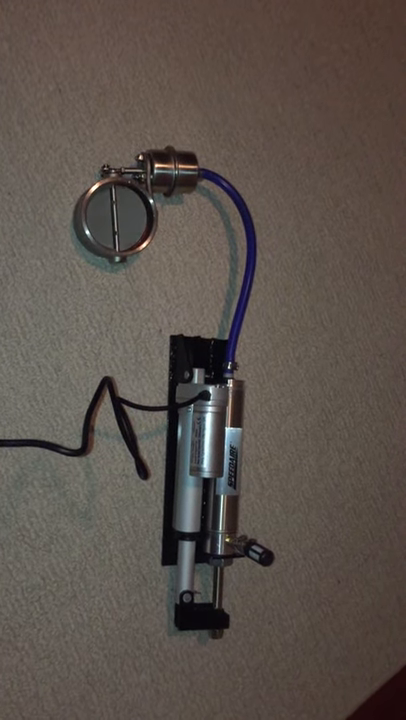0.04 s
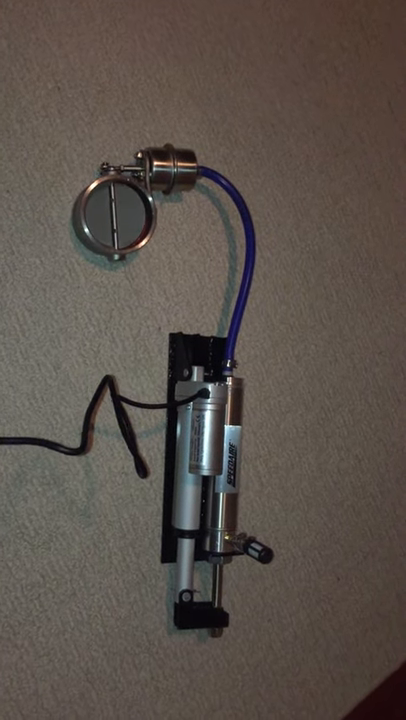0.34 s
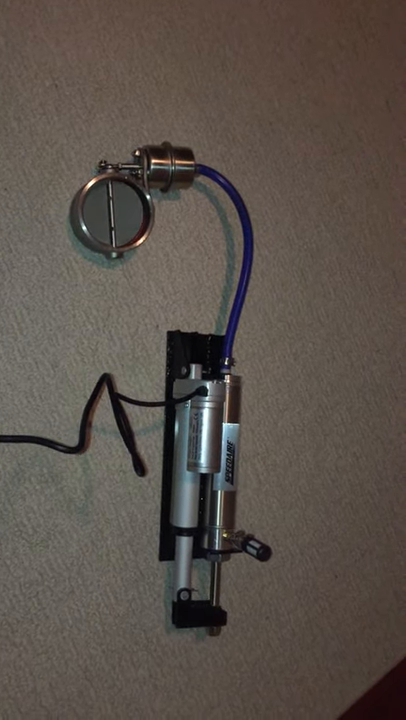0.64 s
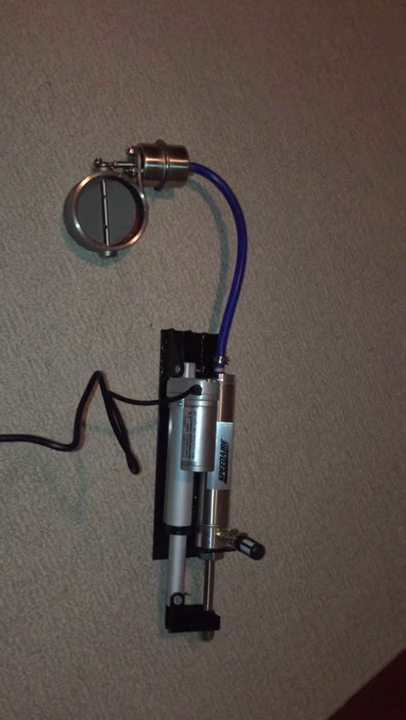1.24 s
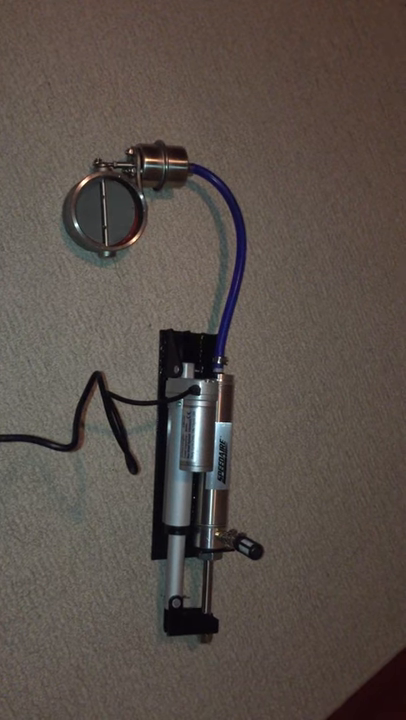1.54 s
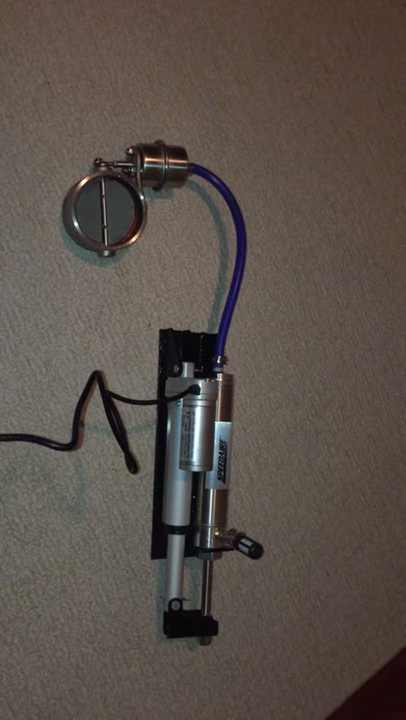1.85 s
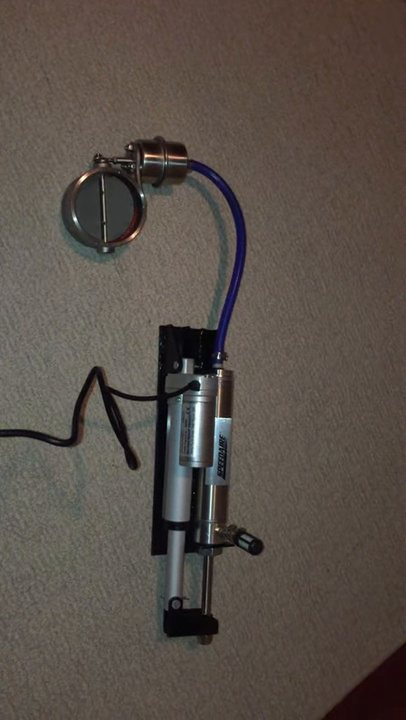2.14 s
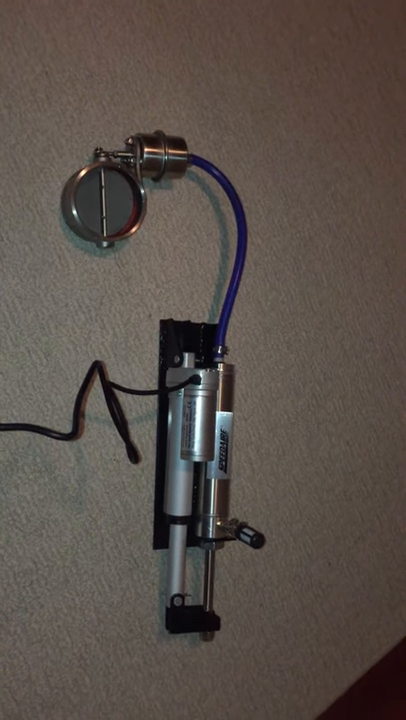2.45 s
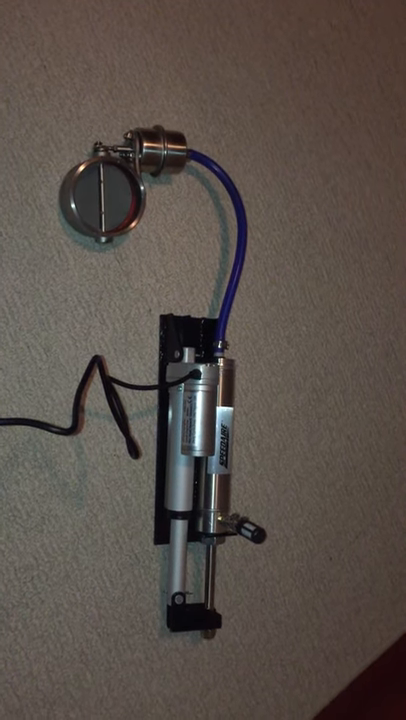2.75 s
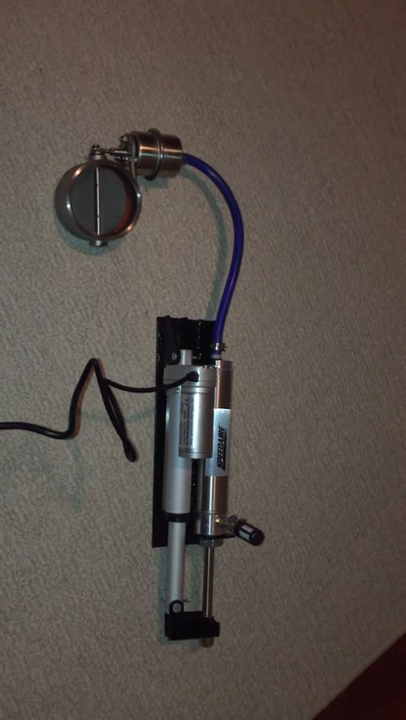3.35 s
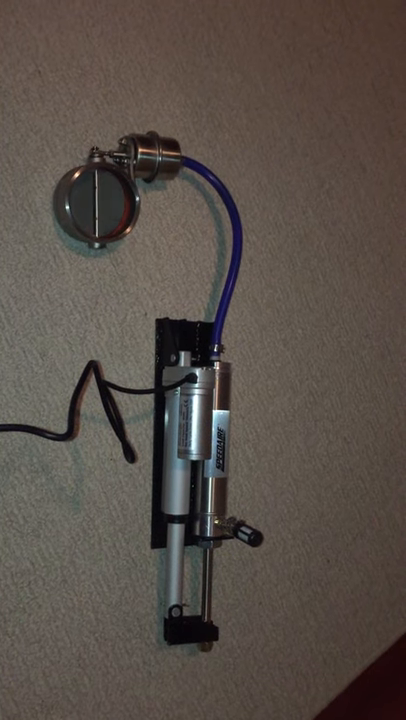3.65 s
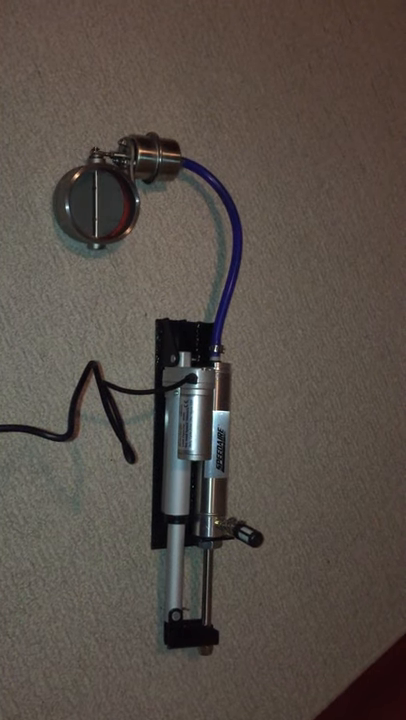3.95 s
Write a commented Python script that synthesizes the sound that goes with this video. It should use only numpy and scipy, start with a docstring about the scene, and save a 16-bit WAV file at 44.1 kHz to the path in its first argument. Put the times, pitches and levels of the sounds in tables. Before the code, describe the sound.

In a small room with little echo, an electric actuator motor blips once and rattles to a stop, then whirs continuously. The gears whine and grind in a fast, repeating pattern, with light ticks and scrapes on top.

```python
"""A small carpeted room with low rumble and mains hum. An electric linear actuator on the floor is jogged
once, coasts to a stop with a chatter of loose gears, then runs on and pushes an air cylinder.
Its gears whine and rasp in a pattern that repeats with each turn of a wheel, while a slower stage
clacks tooth by tooth. Rasp and clacks ring the metal housing; ticks, rubs and scratches sit on top."""
import sys
import numpy as np
from scipy import signal
from scipy.fft import rfft, irfft
from scipy.io import wavfile
from scipy.ndimage import uniform_filter1d, map_coordinates

SR = 44100
rng = np.random.default_rng(int(sys.argv[2]) if len(sys.argv) > 2 else 0)


def materialize(psi):
    """Save the field psi as 16-bit PCM at rate SR to the path in sys.argv[1].

    A 1-D psi becomes a single channel; in a 2-D psi each row is a channel.
    """
    bounded = np.clip(np.atleast_2d(psi).T, -1, 1)
    quanta = np.round(bounded * 32767).astype(np.int16)
    wavfile.write(sys.argv[1], SR, quanta)


N = 176400

# Motor cues. Each row: power on in seconds, power off in seconds, strength in dB.
MOTOR_RUNS = [(.351, .468, -2), (.757, 4.2, -0.5)]
# Gear mesh rate at full speed. Each row: time in seconds, rate in Hz.
MESH_PITCH = [(0.85, 1337), (2.48, 1328), (2.86, 1331), (3.9, 1327)]
# The load on the gears. Each row: time in seconds, gear noise level in dB, treble level in dB.
GEAR_LOAD = [(.4, -49, -51), (.85, -49.5, -53.5), (1.2, -49, -55.5), (1.55, -49, -54), (1.85, -49, -53.5),
             (2.45, -49.5, -53), (2.9, -49.5, -53), (3.4, -49, -52.5), (3.5, -50.5, -52.5),
             (3.73, -51, -53.5), (3.8, -50.5, -53), (4, -50.5, -51.5)]
# The housing's broad resonances, then its finer peaks and dips. Each row: frequency in Hz, gain in dB.
HOUSING_EQ = [(290, -54), (500, -22.5), (726, -19), (803, -15), (1120, -7.5), (1290, -4.5), (1410, -5.5),
              (1580, 2), (1670, -7), (1880, -2.5), (2010, -13.5), (2390, -5.5), (2970, -27.5),
              (3190, -16.5), (3850, -7.5), (4440, -18), (4980, -9.5), (5510, -23), (5830, -23), (6090, -35),
              (7130, -23.5), (8120, -34), (10100, -33), (13600, -32.5), (15500, -36)]
HOUSING_FINE_EQ = [(600, -2), (1000, 1), (1350, 0), (1490, -1), (1560, -2), (1630, 1), (1780, 2),
                   (1855, -2), (1920, 0.5), (2050, -1.5), (2180, 4), (2350, -0.5), (2450, -3.5),
                   (2700, 2.5), (3000, 2), (3250, 1.5), (3450, -2.5), (3700, 3.5), (4100, -0.5), (4330, 2),
                   (4560, 0), (4850, -1), (4980, -10), (5150, 1.5), (5450, -5.5), (5700, 8), (6100, -11),
                   (6450, 14), (6700, -0.5), (7300, 6), (7800, -2.5), (9000, 6.5), (10000, -5.5),
                   (12000, 2)]
# Whine partials. Each entry: cycles per wheel turn; in the second list, dB against the gear noise.
PARTIAL_ORDERS = [64, 65, 67, 70, 76, 80, 92, 96, 114, 132, 158, 178, 180, 240, 300]
PARTIAL_DB = [-24.5, -29, -23, -23, -23.5, -17.5, -19, -19, -22, -23, -21.5, -18.5, -16, -24, -33]
# A low pair of gear tones. Each entry: cycles per wheel turn; in the second list, balance in dB.
GROAN_PAIR = [60, 62]
GROAN_BALANCE = [-4.5, -.5]
# Fader rides for mesh tone, high singing tone, groan and rub. Each row: time in seconds, level in dB.
MESH_RIDE = [(.4, -65), (.95, -57.5), (1.16, -54.5), (1.22, -59), (1.4, -58), (1.62, -56), (1.88, -63),
             (1.95, -52), (1.99, -64), (2.04, -55), (2.09, -62), (2.25, -56.5), (2.5, -53.5), (2.57, -53.5),
             (2.66, -54.5), (2.9, -60.5), (3.42, -57.5), (3.65, -62), (3.86, -67), (3.93, -64), (4, -74)]
SING_RIDE = [(.45, -57), (.88, -71), (.94, -72), (1.1, -58), (1.35, -56), (1.49, -65), (1.56, -58),
             (1.7, -69), (1.78, -65), (2.1, -58.5), (2.4, -59), (2.72, -58), (2.8, -53), (2.95, -58),
             (3.11, -60), (3.26, -58.5), (3.41, -53.5), (3.49, -69), (3.56, -66), (3.68, -56), (3.9, -58),
             (4, -64)]
GROAN_RIDE = [(.9, -75), (1.7, -74), (2.0, -65.5), (2.9, -64.5), (3.9, -64.5)]
RUB_RIDE = [(.4, -73), (1.0, -65), (1.6, -62), (2.3, -58), (3.2, -59), (3.9, -58.5)]
# Wheel faults. Each row: time of one tick in seconds, strength in dB, its own ring in Hz.
WHEEL_FAULTS = [(2.624, -4, 15480), (2.592, -10, 13950)]
# Metal rung by ticks, rubs and chatter. Each row: pitch in Hz, 60 dB decay in seconds, level in dB.
TICK_RING = [(10800, 0.011, -1), (12140, 0.01, -5), (12650, 0.0073, -2), (13850, 0.0067, 0),
             (15470, 0.0067, -7)]
RUB_RING = [(2387, 0.023, 1.5), (4020, 0.041, -5), (4845, .03, -7), (5130, 0.025, -5.5), (5700, 0.015, -18)]
CHATTER_RING = [(990, 0.012, -10), (1336, 0.026, -5), (1840, 0.027, 1.5), (3880, 0.0088, -5),
                (4360, 0.0093, -2)]
# Loose gears. Each row: start in seconds, level in dB, decay in seconds, ring in Hz, ring level in dB.
RATTLES = [(0.369, -53, 0.027, 1830, -48.5), (0.445, -55.5, 0.013, 1320, -66),
           (.554, -51.5, 0.01, 1860, -51.5), (0.588, -57, 0.0095, 1870, -56),
           (0.62, -62, .008, 1333, -54.5), (.762, -68, .008, 4920, -60), (0.783, -62, 0.0092, 685, -62.5)]
# Slack taken up or released. Each row: start in seconds, level into the housing in dB.
SLACK_KNOCKS = [(.35, -28), (0.3658, -13), (.377, -12), (.388, -16), (0.761, -26), (.773, -16)]
# The gears catch. Each row: start in seconds, level in dB, decay in seconds.
GEAR_CATCHES = [(0.371, -51.5, .008), (.396, -57, .006), (0.922, -59, 0.0052), (1.519, -47.5, .004),
                (1.63, -53, .005), (1.795, -55, .01), (2.025, -49, .008), (2.08, -51, 0.006),
                (2.195, -59, .005), (2.243, -52, .008), (2.439, -56, .005), (2.473, -52, .006),
                (2.667, -53, .004), (2.697, -48, .007), (3.014, -55, .006), (3.36, -50, 0.0087)]
# Tones of the slowing gears. Each row: peak time in seconds, pitch there in Hz, level in dB.
COAST_GLIDES = [(.463, 1853, -57), (.486, 2266, -58), (.532, 1790, -54), (.556, 968, -58), (.59, 699, -67),
                (.61, 2170, -63), (.677, 1240, -72)]
# Soft thuds under the whirr. Each row: peak time in seconds, level in dB.
LOW_THUDS = [(.99, -65.5), (1.44, -63), (1.8, -65), (2.45, -63.5), (2.72, -63.5), (3.01, -64), (3.74, -64),
             (3.92, -61)]
# Room tone. Each row: frequency in Hz, gain in dB.
ROOM_TONE_EQ = [(15, -35), (25, -15), (37, -7.5), (122, -10), (136, -12), (148, -14.5), (233, -5.5),
                (289, -7.5), (340, -14.5), (389, -10.5), (433, -12.5), (537, -14), (648, -23.5),
                (4500, -31), (15500, -40.5)]
# Tone of the rasp and of the clacks. Each row: frequency in Hz, gain in dB.
RASP_EQ = [(500, -4), (900, 0), (2500, 0), (5000, -.5), (7000, -6), (14000, -.5)]
CLACK_EQ = [(500, -5), (1000, 1), (2500, -3), (5000, -2), (7000, 1.5), (9000, -1), (14000, -12)]

WHEEL_TEETH, CLACKS_PER_MESH = 100, .0734
SING_ORDER, SQUEAL_ORDER = 118.1, 362  # cycles per wheel turn


def actuator(t):
    """The motor drives the gear train; returns a noise stem and a tone stem."""
    speed, force = motor(t)
    mesh_hz = speed * (1 + .001187 * walk(6)) * np.interp(t, *np.array(MESH_PITCH).T)
    mesh = np.cumsum(mesh_hz) / SR
    turns, teeth = mesh / WHEEL_TEETH, mesh * CLACKS_PER_MESH
    teeth -= np.interp(1.0372, t, teeth)  # a tooth lands at this second
    when, gear_db, treble_db = np.array(GEAR_LOAD).T
    gear_db, treble_db = np.interp(t, when, gear_db), np.interp(t, when, treble_db)
    drive = rasp(turns) + clacks(t, teeth, speed)
    body = housing(drive, brightness(t, turns, speed, treble_db - gear_db))
    whirr = undb(gear_db) * (body + thrum(t) + ticks(t, turns, speed)) + speed ** 2 * rub(t, turns)
    tones = force * speed ** 1.08 * whine(t, turns, gear_db)
    tones = band(tones, 723, 10500, order=6)  # the small housing hardly radiates low tones
    return force * whirr + chatter(t) + knocks() + scratches(t), tones + coasting(t)


def motor(t, spin_up_s=.011, coast_s=.225):
    """Speed 0-1 and strength: a quick spin-up; with power off, friction slows the motor evenly."""
    speed, force = 0, 0
    for on, off, db in MOTOR_RUNS:
        run = (1 - np.exp(-np.maximum(t - on, 0) / spin_up_s)) * np.clip(1 - (t - off) / coast_s, 0, 1)
        speed, force = speed + run, force + undb(db) * run ** 1.37
    return speed, force


def rasp(turns):
    """Worn teeth grind: grain that repeats once, twice and five times a turn, over a scraping hiss."""
    grain = unit(undb(3) * worn(turns, 3000) + undb(-2) * worn(2 * turns, 1500)
                 + undb(-5.5) * worn(5 * turns, 600))
    grind = undb(-4.5) * grain + undb(-5.5) * rng.standard_normal(N)
    throb_db = .39 * walk(24.98) + .74 * np.sin(10 * np.pi * turns)
    return colour(grind * undb(throb_db), RASP_EQ)


def clacks(t, teeth, speed, jitter_s=.00007, spread_s=.003, fade_db_per_s=1.2):
    """Each slow tooth strikes, then scrapes; the strikes soften along the stroke."""
    times = wraps(teeth)
    timing, weight = 2 * rng.random((len(times), 2)).T - 1
    hits = clicks(times + jitter_s * timing, 1 + .45 * weight)
    hz = np.arange(N // 2 + 1) * SR / N
    lag_s = spread_s / (1 + hz / 7000)  # in the metal the highs travel ahead of the lows
    strikes = irfft(rfft(hits) * np.exp(-2j * np.pi * np.cumsum(lag_s) * SR / N), N)
    scrape = unit(np.exp(-((teeth - .1) % 1) / .15) * rng.standard_normal(N))
    clacking = unit(unit(strikes) + undb(-4) * scrape) * speed ** 1.1
    return undb(-2.5 - fade_db_per_s * (t - 1)) * colour(clacking, CLACK_EQ)


def housing(drive, treble_gain):
    """Gear forces ring the metal shell; its treble rides on a separate fader."""
    body = colour(colour(drive, HOUSING_EQ), HOUSING_FINE_EQ)
    mid_rms = np.std(band(body, 800, 2350)[SR:])
    treble = signal.sosfiltfilt(signal.butter(2, 3000, 'high', fs=SR, output='sos'), body)
    return undb(-1.5) * (body - treble + treble * treble_gain) / mid_rms


def brightness(t, turns, speed, tilt_db, surge_db=1.5, flicker_db=1.1):
    """Treble gain: it surges with the load about every third turn and dulls as the motor slows."""
    surge = surge_db * np.cos(2 * np.pi * .331 * turns_since(2.45, t, turns)) * (t > MOTOR_RUNS[1][0])
    return undb(tilt_db - np.mean(tilt_db) + flicker_db * walk(17) + surge) * speed ** .52


def whine(t, turns, gear_db):
    """Meshing teeth sing: a bed of partials, two tones swelling in turn and a growing groan."""
    bed = gear_tones(turns, PARTIAL_ORDERS, PARTIAL_DB, waver_db=2, wobble_rad=.2, throb=.3)
    mesh = gear_tones(turns, [WHEEL_TEETH], [0], waver_db=1.02, wobble_rad=.2)
    sing = gear_tones(turns, [SING_ORDER], [0], waver_db=1.5, wobble_rad=.47, throb=.3)
    groan = gear_tones(turns, GROAN_PAIR, GROAN_BALANCE, waver_db=-.4, wobble_rad=.11)
    return (undb(gear_db) * bed + fader(t, MESH_RIDE) * mesh
            + fader(t, SING_RIDE) * sing + fader(t, GROAN_RIDE) * groan)


def gear_tones(turns, orders, levels_db, waver_db, wobble_rad, throb=0):
    """Wavering sines locked to the wheel, with an optional throb five times a turn."""
    tones = sum(undb(db + waver_db * walk(7)) * sine(k * turns + rng.random(), wobble_rad * walk(25.19))
                for k, db in zip(orders, levels_db))
    return (1 + throb * np.sin(10 * np.pi * turns)) * tones


def rub(t, turns, width_turns=.093, swing_hz=45):
    """The wheel rubs twice a turn; it runs out of true, so the squeal glides up and down in turn."""
    away = ((2 * turns_since(3.324, t, turns) + .5) % 1 - .5) / 2
    contact = swell(away, 0, width_turns)
    friction = worn(2 * turns, 1500) + undb(1.5) * rng.standard_normal(N)
    glide = np.cumsum(swing_hz * np.cos(2 * np.pi * turns_since(2.481, t, turns))) / SR
    squeal = sine(SQUEAL_ORDER * turns + glide, .5 * walk(60)) * undb(.3 + 2.3 * walk(20))
    return fader(t, RUB_RIDE) * (ring(contact * friction, RUB_RING) + contact * squeal)


def ticks(t, turns, speed, decay_turns=.045):
    """Each fault gives a thin metallic tick once a turn, over a sizzle of grit between the teeth."""
    blows, pings = 0, 0
    for at, db, hz in WHEEL_FAULTS:
        gate = np.exp(-(turns_since(at, t, turns) % 1) / decay_turns)
        blow = gate * (worn(turns, 3000) + rng.standard_normal(N))
        blows += undb(db) * blow
        pings += ring(blow, [(hz, .012, 0)])
    grit = rng.standard_normal(N) * undb(2.8 * walk(300) + 2.2 * walk(24.7))
    metal = undb(-2.5) * ring(blows, TICK_RING) + undb(-7.5) * pings + undb(-3) * ring(grit, TICK_RING)
    return undb(-24.5 + .36 * (t - 2.5)) * speed ** 3 * metal


def chatter(t):
    """Loose gears rattle as the motor starts and coasts; each rattle leaves one resonance ringing."""
    envelope, rings = 0, 0
    for at, db, decay_s, ring_hz, ring_db in RATTLES:
        envelope += undb(db) * burst(t, at, decay_s)
        rings += undb(ring_db) * burst(t, at, decay_s=.008) * sine(ring_hz * (t - at))
    return envelope * ring(rng.standard_normal(N), CHATTER_RING) + rings


def knocks(rest_s=.692):
    """Gear slack knocks on the housing; a light click marks the gears coming to rest."""
    at, db = np.array(SLACK_KNOCKS).T
    return colour(clicks(at, undb(db)), HOUSING_EQ) + band(clicks([rest_s], undb(-46)), 2500, 15000)


def scratches(t):
    """Brief bright scrapes where the gears catch."""
    envelope = sum(undb(db) * burst(t, at, decay_s) for at, db, decay_s in GEAR_CATCHES)
    return envelope * unit(band(rng.standard_normal(N), 3620, 4240, order=3))


def coasting(t, fall_per_s=4):
    """Gear tones swell and slide down as the motor slows."""
    tones = 0
    for at, hz, db in COAST_GLIDES:
        cycles = hz * np.exp(-fall_per_s * (t - at)) / fall_per_s
        tones += undb(db) * swell(t, at, width_s=.013) * sine(cycles, .55 * walk(150))
    return tones


def thrum(t):
    """A low, uneven thrum that builds along the stroke."""
    return undb(-22 + 2.2 * (t - 3.5) + 2.4 * walk(9)) * unit(band(rng.standard_normal(N), 220, 324))


def thuds(t, hz=255):
    """Dull low swells of unsteady pitch."""
    envelope = sum(undb(db) * swell(t, at, width_s=.026) for at, db in LOW_THUDS)
    return envelope * sine(hz * t, 1.45 * walk(60))


def room(x, t, t60_s=.2, wet_db=-12.5):
    """Add the short, soft reflections of a carpeted room."""
    age = t[:SR // 2]
    tail = band(rng.standard_normal(len(age)), 120, 9000, order=1)
    tail *= undb(-60 * age / t60_s) * (age > .003)
    return x + undb(wet_db) * signal.fftconvolve(x, tail / np.sqrt(np.sum(tail ** 2)))[:N]


def room_tone(t, hum_hz=119.1):
    """A bed of low rumble, faint hiss and mains hum."""
    rumble = unit(colour(rng.standard_normal(N), ROOM_TONE_EQ))
    return undb(-66.5) * rumble + undb(-75.5) * sine(hum_hz * t)


def undb(db):
    """Decibels to gain."""
    return 10 ** (np.asarray(db) / 20)


def unit(x):
    """Scale to rms 1."""
    return x / np.sqrt(np.mean(x ** 2))


def sine(cycles, phase=0):
    """A sine of rms 1."""
    return np.sqrt(2) * np.sin(2 * np.pi * cycles + phase)


def walk(rate_hz):
    """Smooth random drift of rms 1."""
    hold = max(int(SR / rate_hz), 2)
    return unit(uniform_filter1d(np.repeat(rng.standard_normal(N // hold + 1), hold), hold)[:N])


def worn(turns, bumps):
    """The random roughness of a wheel, met again on every turn."""
    surface = rng.standard_normal(bumps) * undb(2 * rng.standard_normal(bumps))
    return unit(map_coordinates(surface, [turns % 1 * bumps], order=3, mode='grid-wrap'))


def turns_since(at, t, turns):
    """Wheel turns counted from a cue in seconds."""
    return turns - np.interp(at, t, turns)


def wraps(cycles):
    """Times at which a cycle count passes a whole number."""
    return np.interp(np.arange(np.ceil(cycles[0]), cycles[-1]), cycles, np.arange(N) / SR)


def fader(t, points):
    """Gain from points in seconds and dB."""
    return undb(np.interp(t, *np.array(points).T))


def burst(t, at, decay_s, attack_s=.005):
    """A quick rise and a tail whose power falls by 1/e in decay_s."""
    return np.clip((t - at) / attack_s + 1, 0, 1) * np.exp(-np.maximum(t - at, 0) / (2 * decay_s))


def swell(t, at, width_s):
    """A bell-shaped rise and fall."""
    return np.exp(-.5 * ((t - at) / width_s) ** 2)


def clicks(times, sizes):
    """Sharp pulses placed between the samples."""
    out, at = np.zeros(N), np.asarray(times) * SR
    for k in np.arange(-7, 9):
        i = at.astype(int) + k
        np.add.at(out, np.clip(i, 0, N - 1), sizes * np.sinc(i - at) * np.sinc((i - at) / 8) * (i < N))
    return out


def ring(x, modes):
    """Drive damped resonances; rms 1."""
    age = np.arange(SR // 10) / SR
    response = sum(undb(db - 60 * age / t60) * np.sin(2 * np.pi * hz * age) for hz, t60, db in modes)
    return unit(signal.fftconvolve(x, response)[:N])


def colour(x, points, size=4096):
    """Minimum-phase EQ through points in Hz and dB."""
    hz, db = np.array(points).T
    bins_hz = np.maximum(np.arange(size // 2 + 1) * SR / size, 1)
    cepstrum = irfft(np.log(undb(np.interp(np.log(bins_hz), np.log(hz), db))))
    cepstrum[1:size // 2] *= 2
    cepstrum[size // 2 + 1:] = 0
    return signal.fftconvolve(x, irfft(np.exp(rfft(cepstrum))))[:N]


def band(x, lo_hz, hi_hz, order=2):
    """Band-pass."""
    return signal.sosfilt(signal.butter(order, [lo_hz, hi_hz], 'band', fs=SR, output='sos'), x)


def scene():
    """The actuator over room tone; only its noise stem feeds the reverb."""
    t = np.arange(N) / SR
    noise, tones = actuator(t)
    bed = room_tone(t)
    return (room(noise, t) + tones + thuds(t) + bed)[None]


def record(dry):
    """Cut the deepest bass and the very top."""
    dry = signal.sosfilt(signal.butter(6, 39, 'high', fs=SR, output='sos'), dry)
    return signal.sosfilt(signal.ellip(10, .2, 70, 15750, fs=SR, output='sos'), dry)


dry = scene()
out = record(dry)
materialize(out)
```